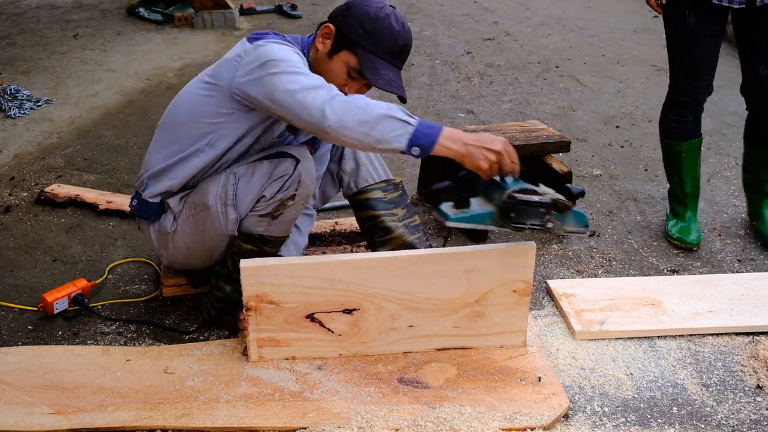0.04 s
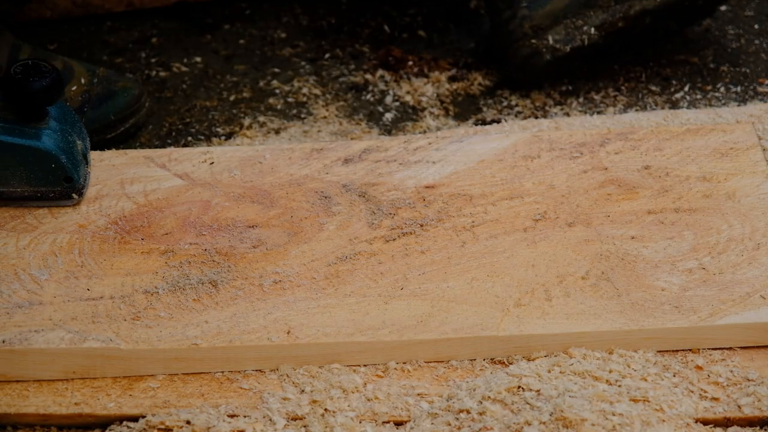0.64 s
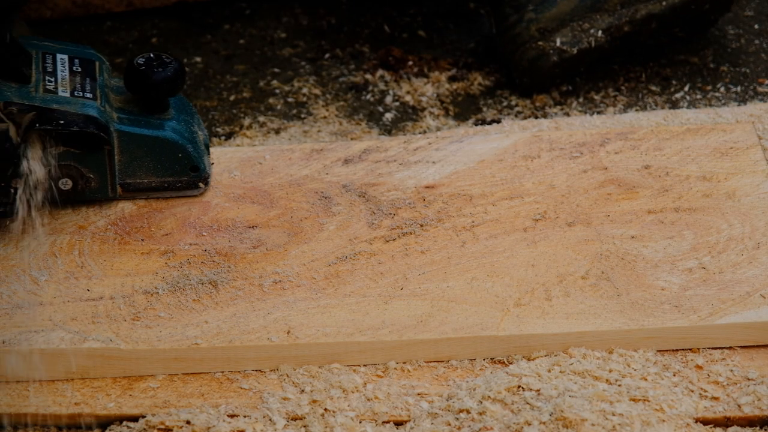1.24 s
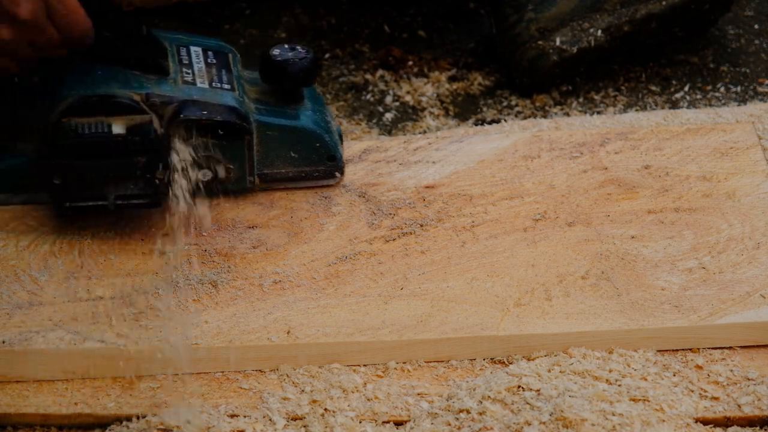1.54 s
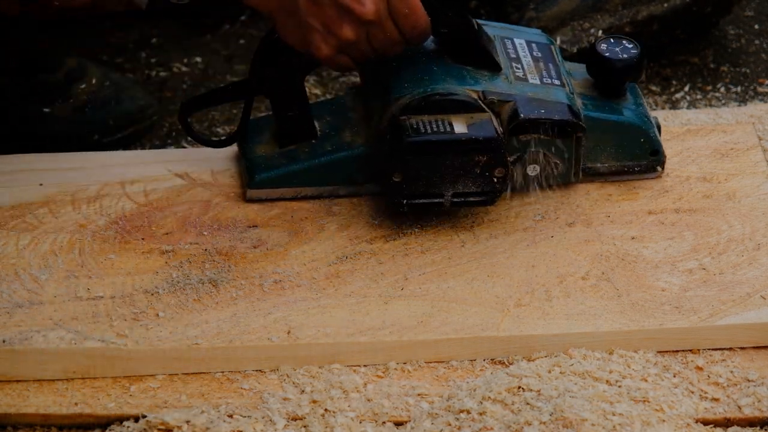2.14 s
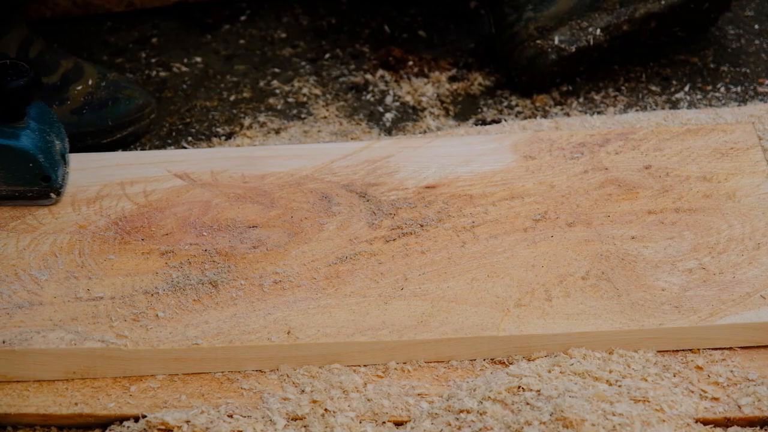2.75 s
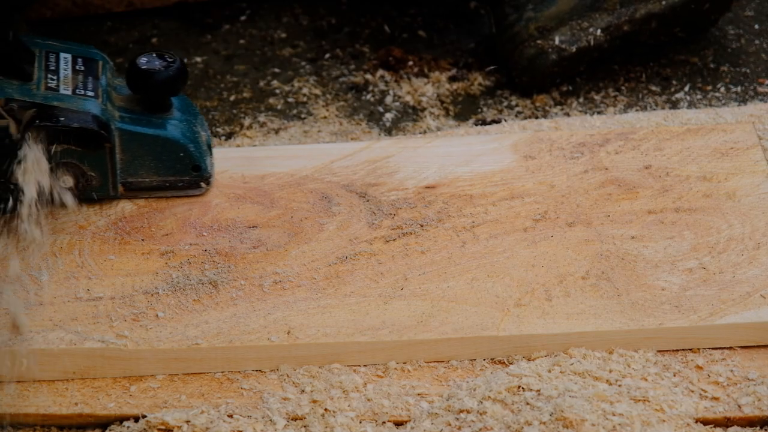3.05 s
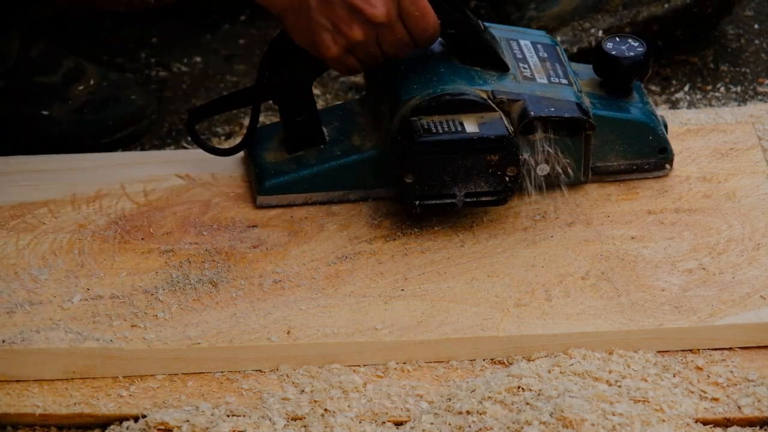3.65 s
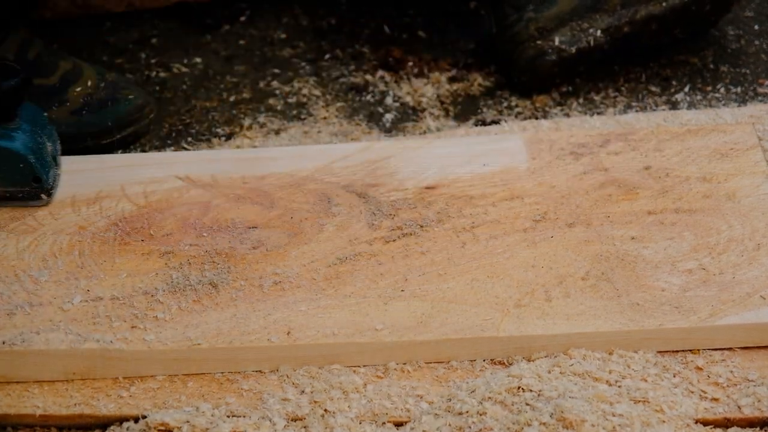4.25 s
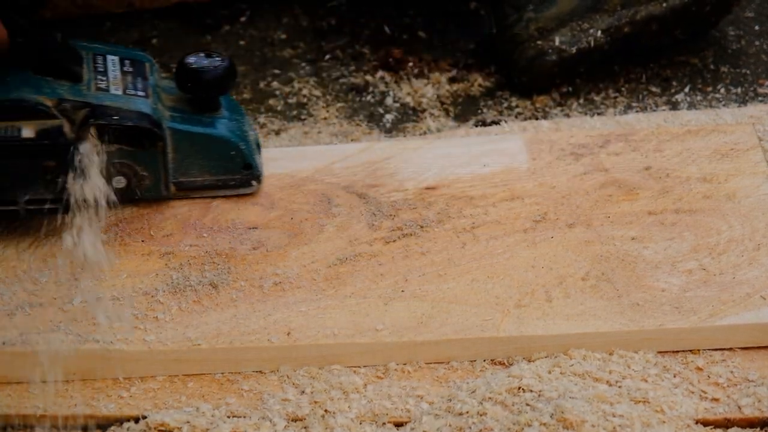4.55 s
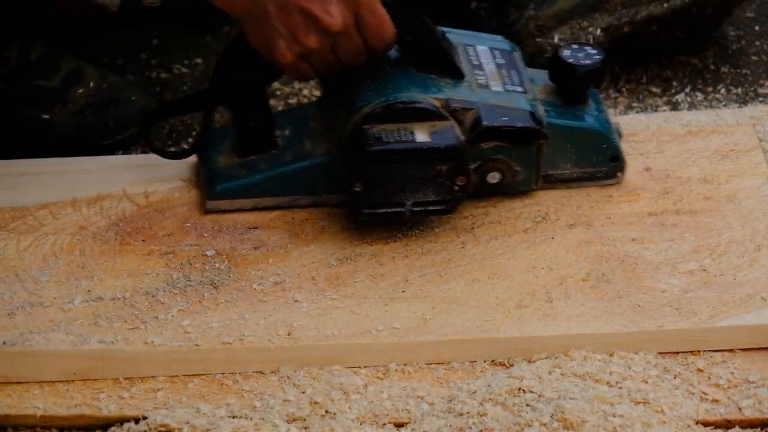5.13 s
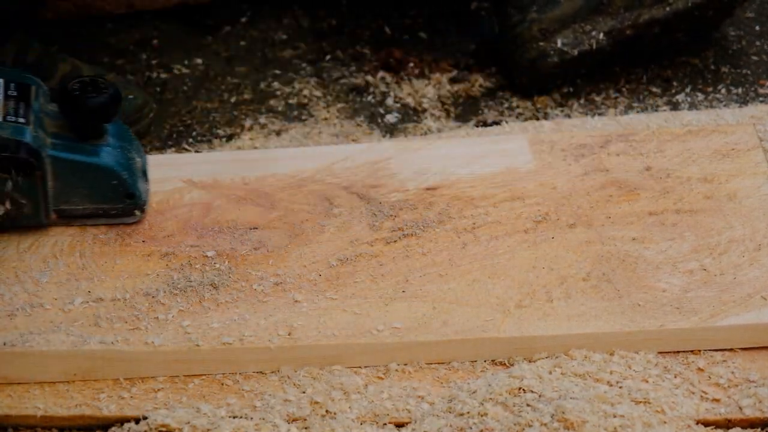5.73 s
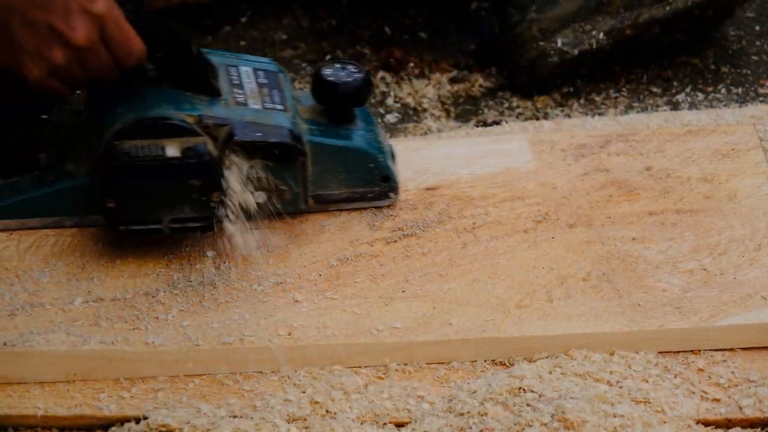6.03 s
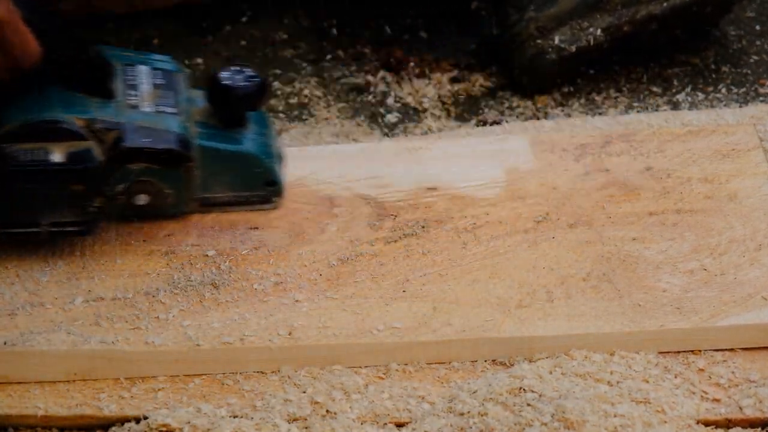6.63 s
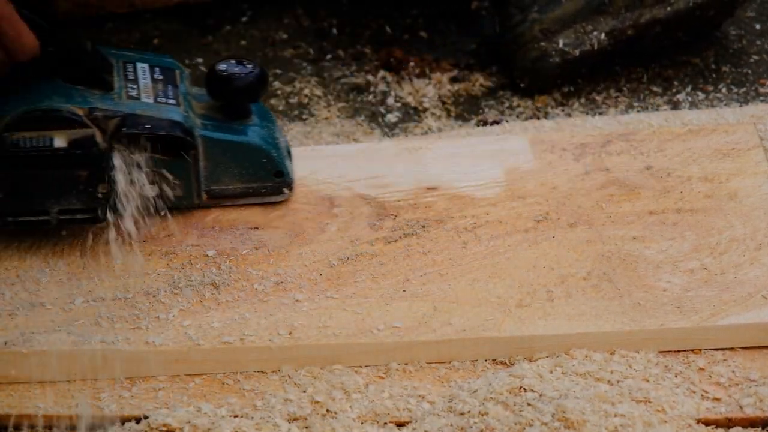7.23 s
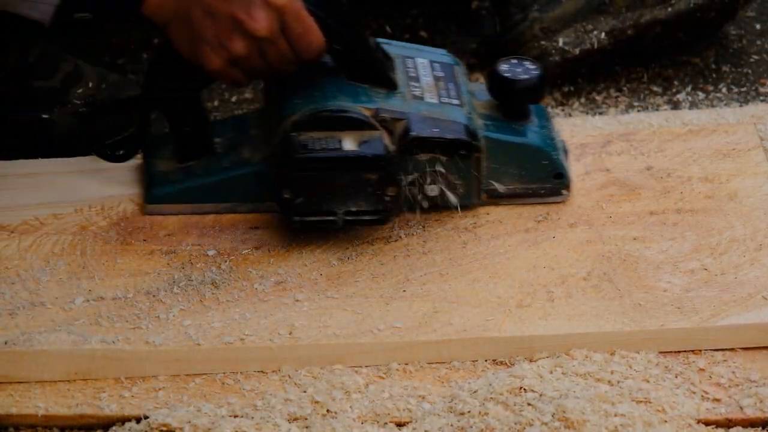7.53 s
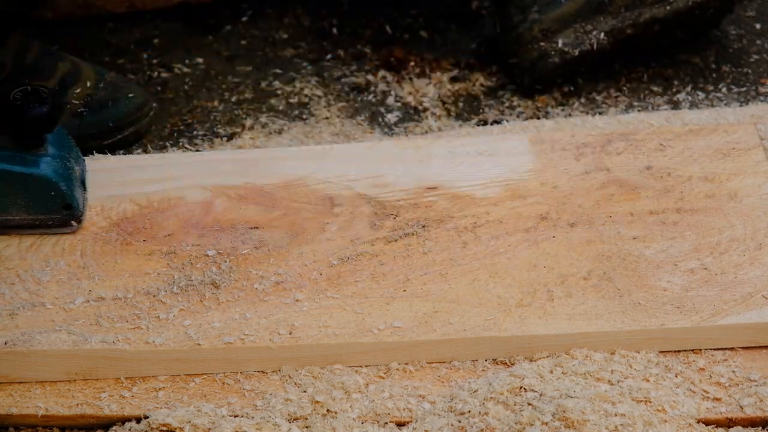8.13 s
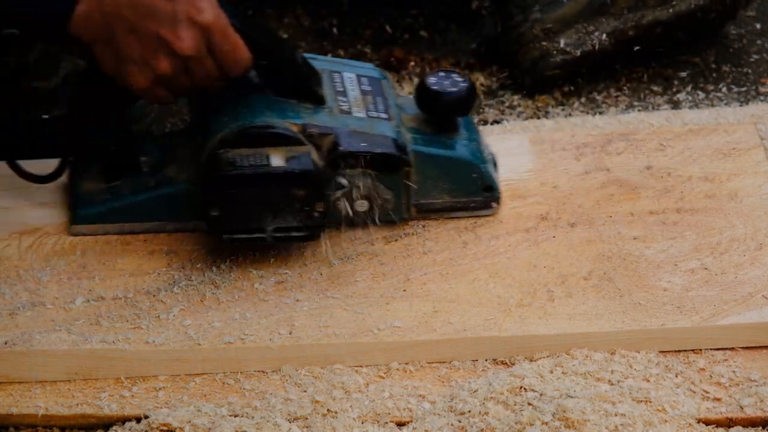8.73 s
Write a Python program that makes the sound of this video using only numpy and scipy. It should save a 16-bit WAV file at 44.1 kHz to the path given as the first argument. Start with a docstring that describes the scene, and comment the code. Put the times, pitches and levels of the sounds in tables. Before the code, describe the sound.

Heard up close, an electric hand planer coasts briefly, falls suddenly quiet, then clicks on and rises to a high whine. Its blade bites into a wooden board six times at an even pace, with a harsh, ringing buzz and a fine crackle of chips, distorting a little at the loudest points. The motor sags under each pass and climbs back in between, humming and blowing air, with an occasional light knock on the wood.

```python
"""Electric hand planer on a board

A moment of the planer coasting fast cuts off abruptly; from a quiet, slow coast it spins up and takes six
strokes along a wooden board. Its cutter drum hums and its belt-driven motor whines over the fan's rush.
In each stroke the blade hammers the board once a turn, dragging the speed down and overloading the mic."""
import sys
import numpy as np
from scipy import signal
from scipy.fft import rfft, irfft, next_fast_len
from scipy.io import wavfile
from scipy.ndimage import uniform_filter1d

SR = 44100
rng = np.random.default_rng(int(sys.argv[2]) if len(sys.argv) > 2 else 0)


def dump_mix(stems):
    """Bounce the given channels to the path in sys.argv[1] as a 16-bit WAV at rate SR."""
    frames = np.atleast_2d(stems).T  # one column per channel
    limited = np.clip(frames, -1, 1)  # hard clip at full scale
    pcm = np.round(limited * 32767).astype(np.int16)
    wavfile.write(sys.argv[1], SR, pcm)


N = 396018
TIME = np.arange(N) / SR


def amp(db):
    return 10 ** (np.asarray(db) / 20)


def unit_rms(x):
    return x / np.sqrt(np.mean(x ** 2) + 1e-20)


def curves(rows, along=TIME):
    """One automation curve for each column of a table, read along its first column."""
    at, *columns = np.transpose(rows)
    return [np.interp(along, at, column) for column in columns]


def eq(x, points):
    """Filters x through a curve of (frequency [Hz], gain [dB]) points."""
    hz, db = np.transpose(points)
    size = next_fast_len(N, True)
    gain = amp(np.interp(np.log(np.fft.rfftfreq(size, 1 / SR) + 1), np.log(hz), db))
    return irfft(rfft(x, size) * gain, size)[:N]


def drift(per_s):
    """Smooth random modulation of about unit size."""
    steps = rng.standard_normal(3000)
    return np.interp(TIME * per_s, np.arange(len(steps)), steps) * np.sqrt(3 / 2)


# the body of the board: (frequency [Hz], gain [dB])
BOARD_EQ = [(60, -44), (220, -26.5), (430, -14), (700, -6.5), (1000, -1.5), (2500, 1), (4000, 0),
            (5500, -3.5), (7000, -14), (10000, -32.5), (16000, -25)]
# where the blade catches a board mode: (place [cm], spread [cm], frequency [Hz], lift [dB])
BOARD_MODES = [(5, .3, 3260, 6), (5.6, 0.75, 2530, 6.5), (6.4, 1.7, 1810, 6), (7.45, 0.55, 2340, 10.5),
               (9.1, 1.85, 1360, 6), (9.9, 0.44, 5250, 10.5), (14.2, 2.2, 1750, 10), (15.9, 1.9, 1970, 7),
               (21.8, 2.2, 2857, 14.5), (24.7, 12.7, 1020, 6), (26.9, 10, 3480, 2), (31.4, 7.2, 1970, 7),
               (33.3, 2.2, 2460, 12), (41.5, 3.31, 5100, 9)]


def cutting(turns, place, width_hz=210):
    """The blade rings the board, whose modes come and go along the stroke; chips snap at each strike."""
    bite, bright_db, ring = blade()
    blows = eq(strikes(turns), BOARD_EQ)
    modes = sum(amp(db) * np.exp(-.5 * ((place - cm) / spread) ** 2) * resonate(blows, hz, width_hz)
                for cm, spread, hz, db in BOARD_MODES)
    wood = blows + squeals(blows) + ring * modes
    dull = eq(wood, [(900, -1.5), (2000, -3.5), (5000, -7)])
    wood = dull * amp(-bright_db) + (wood - dull) * amp(bright_db)
    wood /= np.sqrt(abs(uniform_filter1d(wood ** 2, size=1200)) + 1e-12)  # bite alone sets the level
    snaps = rng.standard_normal(N) * np.exp(-(turns % 1) / .25) * amp(.83 * drift(260))
    chips = unit_rms(eq(snaps, [(1500, -35), (5000, 6.5), (13000, 3), (16000, -12)]))
    return bite * (wood + amp(-17.5) * chips)


# the blade entering and leaving the wood: (start [s], end [s], drag in [Hz/s], drag out [Hz/s],
# bite in [dB], bite out [dB], brightness in [dB], brightness out [dB], board ring [dB],
# squeal pitch [Hz], squeal lift [dB])
CUTS = [(0.757, 0.972, 66, 109, -9.5, -11.5, -2, -7, -1, 1860, 7),
        (1.05, 1.598, 84, 46, -10.5, -12.5, -7.5, 2.5, -1.5, 3430, 4.5),
        (1.67, 1.888, 55, 32, -10, -16.5, 4, 0, -6, 3560, 10.5),
        (2.038, 2.2, 34, 0, -14, -13.5, -1, 1, -16, 2100, -8),
        (2.88, 3.497, 121, 33, -6, -12, -1.5, 6, -1.5, 2532, -1),
        (3.621, 3.71, 13, 12, -12, -11.5, 0, -3, -10, 3450, 10),
        (4.378, 4.84, 160, 31, -3.5, -11, -2, -3, -0.5, 2523, 7.5),
        (4.849, 4.94, 0, 0, -16.5, -17.5, 2, 8, -11, 4950, -2),
        (5.085, 5.113, 0, 0, -11, -18, -8, 4, -8, 3400, -6),
        (5.741, 6.129, 78, 61, -7, -11.5, -3.5, -1, -9, 1825, 1.5),
        (6.18, 6.4, 90, 0, -13.5, -13.5, 2, 0, -6, 4800, 6.5),
        (6.96, 7.471, 143, 23, -5.5, -12.5, -2, 0, -6.5, 2060, 4),
        (7.62, 7.718, 24, 13.5, -23.5, -14, 2, 4, -8, 4670, 3),
        (8.33, 8.701, 58.5, 63, -7.5, -12.5, -2.5, 4, -9, 1872, 7),
        (8.792, 8.988, 62.5, 8.5, -15, -17.5, -6, 2, -4, 5030, 5)]
ATTACK_S, RELEASE_S = .011, .016


def blade(jolt_s=.012, skim_db=-19.5, skim_gap_s=.16):
    """Bite, brightness and ring envelopes: each cut jolts in bright, slides along and lets go."""
    bite, jolt, timbre = np.zeros(N), np.zeros(N), []
    for start, end, drag, _, in_db, out_db, bright_in, bright_out, ring_db, *_ in CUTS:
        near = slice(*np.searchsorted(TIME, [start, end + 10 * RELEASE_S]))
        t = TIME[near]
        jolt[near] = drag * np.exp((start - t) / jolt_s)
        attack = np.minimum((t - start) / ATTACK_S, 1)
        release = np.exp(-np.maximum(t - end, 0) / RELEASE_S)
        bite[near] += amp(np.interp(t, [start, end], [in_db, out_db])) * attack * release
        timbre += [(start, bright_in, ring_db), (end, bright_out, ring_db)]
    for (_, end, *_), (start, *_) in zip(CUTS, CUTS[1:]):
        if start - end < skim_gap_s:  # between close cuts the blade still skims the wood
            bite = np.maximum(bite, amp(skim_db) * (TIME > end) * (TIME < start + ATTACK_S))
    bright_db, ring_db = curves(timbre)
    grain_db, grain_bright_db = 1.32 * drift(18), 1.5 * drift(16)
    return bite * amp(grain_db), bright_db + .14 * jolt + grain_bright_db, amp(ring_db)


def strikes(turns, memory=.96, decay_turns=.65, size=256):
    """One burst a turn; its fine shape changes slowly as the blade travels through the grain."""
    grain = signal.lfilter([1], [1, -memory], rng.standard_normal((2200, size)), axis=0)  # a row a turn
    fall = np.exp(-np.arange(size) / size / decay_turns)
    spectra = rfft(grain * fall, axis=1)
    bursts = unit_rms(irfft(spectra / abs(spectra) ** (1 / 3), axis=1))  # many modes share the blow
    buzz = np.interp(turns * size, np.arange(bursts.size), bursts.ravel())
    tearing = unit_rms(rng.standard_normal(N) * np.exp(-(turns % 1) / decay_turns))
    return (unit_rms(buzz) + .054 * tearing) * amp(.29 * drift(120))


def squeals(blows, width_hz=240, rise_share=.91):
    """In each cut the blade locks on to one resonance, which swells as the cut goes on."""
    out = np.zeros(N)
    for start, end, *_, hz, db in CUTS:
        near = slice(*np.searchsorted(TIME, [start, end + 3 * RELEASE_S]))
        swell = np.minimum((TIME[near] - start) / (rise_share * (end - start)), 1)
        out[near] += amp(db) * swell * resonate(blows[near], hz, width_hz)
    return out


def resonate(x, hz, width_hz):
    """A resonance with unity gain at its peak."""
    return signal.lfilter(*signal.iirpeak(hz, hz / width_hz, fs=SR), x)


def tone(cycles, db, waver_db, smear_rad):
    """One partial of a turning part, wavering in level and phase as the machine moves."""
    level = np.sqrt(2) * amp(db + waver_db * drift(11))
    return level * np.sin(2 * np.pi * (cycles + rng.random()) + smear_rad * drift(45))


# standing waves over the board favour each tone at different places:
# (place [cm], drum note [dB], hum [dB], octave [dB], motor gain [dB], fan gain [dB])
STANDING_WAVES = [(3.5, -43, -32.5, -34, -4.5, -1), (7, -43, -30.5, -21, -2, 0),
                  (11, -50, -26.5, -23.5, -1.5, 1.5), (15.9, -40, -26, -22, -0.5, 1.5),
                  (23, -53, -23.5, -20, 0, -1.5), (31.6, -45, -23, -25, 0, 1.5),
                  (38.016, -40, -25.5, -22.5, -1, -4), (43, -44, -26, -21, 0, 0),
                  (47.3, -46.5, -25, -25, 0.5, -3.5)]


def drum_hum(turns, hz, place, hum_onset_hz=167, octave_onset_hz=185):
    """The drum chops the air into a hum and its octave; each dies away below its onset speed."""
    _, hum_db, octave_db, _, _ = curves(STANDING_WAVES, place)
    hum = tone(2 * turns, hum_db, 1.5, .1) / np.hypot(1, (hum_onset_hz / hz) ** 5)
    octave = tone(4 * turns, octave_db, 1.5, .23) / np.hypot(1, (octave_onset_hz / hz) ** 5)
    return hum + octave


# drum overtones: (multiple of drum speed, level [dB])
DRUM_TONES = [(3, -38), (6, -35), (7, -41), (8, -32), (9, -40), (10, -36), (12, -38), (16, -42), (18, -43),
              (20, -42), (24, -43), (32, -50)]
# belt tones: (multiple of belt flutter, level [dB])
BELT_TONES = [(1, -39), (2, -36)]
# motor tones, shaken into sidebands by the drum: (motor speed multiple, offset [drum speeds], level [dB])
MOTOR_TONES = [(4, -1, -31), (4, 0, -38), (4, 1, -35), (6, -2, -41), (6, -1, -29), (6, 0, -31), (6, 1, -31),
               (6, 2, -39), (8, -1, -44), (8, 1, -33), (8, 2, -39), (12, -1, -40), (12, 0, -45),
               (14, -1, -46), (14, 1, -47), (16, -1, -47), (16, 1, -54)]
# the ten fan blades, same columns
FAN_TONES = [(10, -1, -39), (10, 0, -28.5), (10, 1, -31)]
# how the shell radiates the tones: (frequency [Hz], gain [dB])
SHELL_EQ = [(120, -21), (185, -6), (210, 0), (235, 1.5), (500, -8), (900, -2), (1500, -1.5), (1850, 0.5),
            (2250, 0), (2650, 2), (3000, -2.5), (3350, 5), (3800, -1), (4200, -1.5), (8000, 2)]
# how the vents pass the fan's whine: (frequency [Hz], gain [dB])
VENT_EQ = [(1500, -6), (3000, -3), (3430, 5), (3650, -11), (3900, -1.5), (4200, 0), (4600, -6),
           (4900, -2.5), (5100, 3.5), (5280, -2.5), (5600, -14)]


def whine(turns, pace, place, motor_ratio=2.202, belt_ratio=8 / 3):
    """Returns the fan singing through the vents, and drum, belt and motor singing through the shell."""
    note_db, _, _, motor_db, fan_db = curves(STANDING_WAVES, place)
    drum = tone(turns, note_db, waver_db=2.5, smear_rad=.19)
    drum += sum(tone(k * turns, db, 3.5, .35) for k, db in DRUM_TONES)
    belt = sum(tone(k * belt_ratio * turns, db, 5.5, .58) for k, db in BELT_TONES)
    motor = sum(tone((k * motor_ratio + side) * turns, db, 2.5, .4) for k, side, db in MOTOR_TONES)
    fan = sum(tone((k * motor_ratio + side) * turns, db, 3.5, .8 / pace ** 2)
              for k, side, db in FAN_TONES)
    vents = amp(fan_db) * pace ** 1.1 * eq(fan, VENT_EQ)
    shell = eq(pace * (drum + belt) + amp(motor_db) * motor / pace ** .24, SHELL_EQ)
    return vents, shell


# the colour of the rushing air: (frequency [Hz], gain [dB])
AIR_EQ = [(110, -49), (200, -28), (300, -17), (420, -1.5), (600, -7.5), (930, 4.5), (1450, -6.5),
          (2100, -8.5), (3200, -3.5), (4200, -8), (5200, -5), (7200, -15.5), (12500, -23), (16000, -25.5)]


def air(turns, pace, throb=.12):
    """Turbulence from fan and drum pulses with each turn; its low roar fills in near full speed."""
    turbulence = rng.standard_normal(N) * (1 + throb * np.cos(2 * np.pi * turns))
    rush = unit_rms(eq(turbulence, AIR_EQ))
    roar = eq(rush, [(1100, 0), (1600, -36)])
    return amp(-20 + .5 * drift(25)) * (rush + (pace ** .85 - 1) * roar)


# resonances of the housing: (frequency [Hz], width [Hz], gain [dB])
HOUSING_MODES = [(1130, 65, -2), (1767, 195, 3.5), (2500, 1300, -11.5), (3340, 130, 0), (5390, 640, -9)]


def rattle(pace):
    """Brushes and bearings ring the housing, even while the rotor coasts."""
    scrape = rng.standard_normal(N)
    ring = sum((-1) ** k * amp(db) * resonate(scrape, hz, width)
               for k, (hz, width, db) in enumerate(HOUSING_MODES))
    ring = eq(ring, [(200, -20), (900, -4), (6000, 3.5), (9000, -5)])
    return amp(-27.5) * unit_rms(ring) * pace ** .71


# trigger and sole hits: (time [s], level [dB], centre [Hz], decay [s])
KNOCKS = [(.405, -42, 230, 0.022), (.395, -34, 3000, 0.023), (3.945, -27, 860, 0.014),
          (5.1, -20, 1100, 0.0098), (6.664, -28, 1000, 0.017), (7.562, -18, 2507, 0.0043)]


def knocks():
    """The trigger clicks and the sole knocks on the board: short bursts of band-passed noise."""
    out = np.zeros(N)
    for start, db, hz, decay in KNOCKS:
        blow = unit_rms(eq(rng.standard_normal(N), [(hz / 4, -25), (hz, 0), (hz * 4, -22)]))
        out += amp(db) * blow * (TIME >= start) * np.exp(-abs(TIME - start) / decay)
    return out


# the rotor coasting fast, then an abrupt cut to a slow coast before the trigger is pulled:
# (time [s], drum speed [Hz])
OPENING_SPEED = [(0.0, 220.7), (0.04, 219.6), (0.166, 210.7), (0.169, 70.0), (0.38, 61.2)]
TRIGGER_S = .38


def drum_speed(pull_hz_per_s=1903.87, pull_fade_hz=64.11, friction_hz_per_s=25.33, step_s=.002):
    """Turns a second: the motor pulls less as it speeds up, against friction and the drag of the cuts."""
    t = np.arange(TRIGGER_S, N / SR, step_s)
    drag = sum(np.interp(t, cut[:2], cut[2:4], 0, 0) for cut in CUTS)
    hz = [OPENING_SPEED[-1][1]]
    for load in drag[:-1]:
        pull = pull_hz_per_s * np.exp(-hz[-1] / pull_fade_hz)
        hz.append(hz[-1] + step_s * (pull - friction_hz_per_s - load))
    return np.where(TIME < TRIGGER_S, curves(OPENING_SPEED)[0], np.interp(TIME, t, hz))


# pushes along the board: (start [s], end [s], from [cm], to [cm])
STROKES = [(0.695, 2.2, 4.55, 48), (2.636, 3.697, 4.1, 45.7), (4.18, 5.032, 3.5, 47.7),
           (5.485, 6.358, 5.9, 48.4), (6.798, 7.744, 4.24, 54.6), (8.127, 9.038, 5.8, 49.5)]


def travel():
    """Place on the board in cm: the hand eases the planer forward, then draws it back."""
    rows = np.array(STROKES)
    times, places = rows[:, :2].ravel(), rows[:, 2:].ravel()
    legs = np.arange(len(times))
    leg, progress = np.divmod(np.interp(TIME, times, legs), 1)
    progress = np.where(leg % 2, progress, progress ** 1.26)  # a push gathers speed late
    return np.interp(leg + .5 - .5 * np.cos(np.pi * progress), legs, places)


def scene():
    """The drum's speed and the planer's place on the board drive the machine and the cutting."""
    hz, place = drum_speed(), travel()
    pace = hz / 225  # share of working speed
    turns = np.cumsum(hz * (1 + .0007 * drift(30))) / SR
    hum = drum_hum(turns, hz, place)
    vents, shell = whine(turns, pace, place)
    power_db = np.where(TIME < TRIGGER_S, -6.5, .5)  # softer with the motor off
    machine = amp(power_db) * pace ** 1.32 * (air(turns, pace) + shell)
    return (hum + vents + machine + rattle(pace) + cutting(turns, place) + knocks())[None]


def record(dry, ceiling=.62, knee=9, cutoff_hz=15780):
    """The overloaded input soft-clips the loud peaks; a steep low-pass trims the top."""
    clipped = dry / (1 + abs(dry / ceiling) ** knee) ** (1 / knee)
    lowpass = signal.firwin(511, cutoff_hz, window=("kaiser", 9), fs=SR)
    return signal.oaconvolve(clipped, lowpass[None], "same")


dry = scene()
out = record(dry)
dump_mix(out)
```